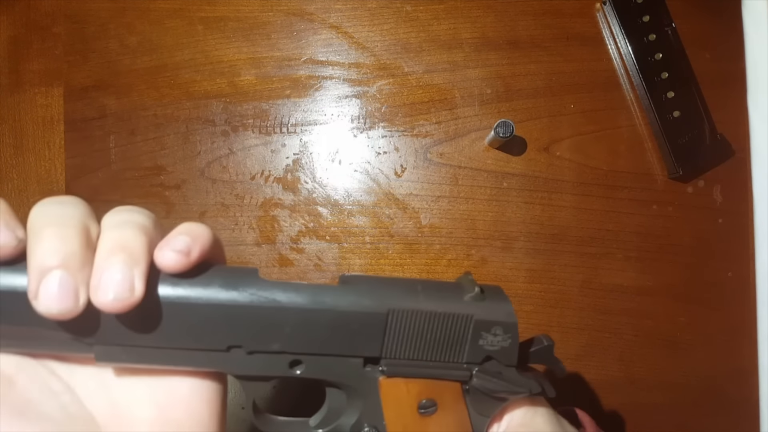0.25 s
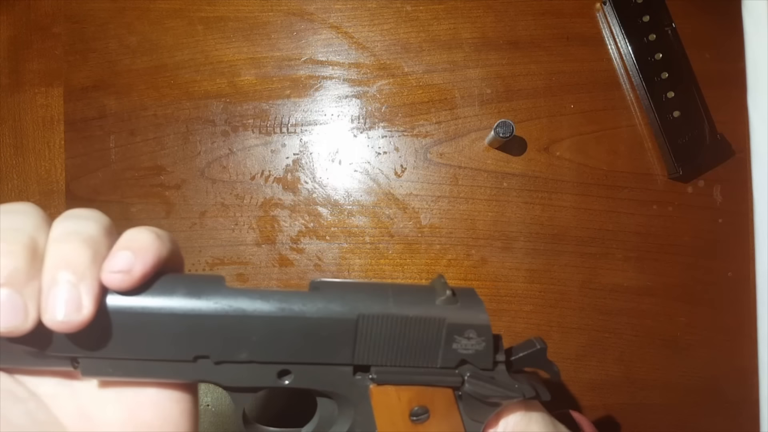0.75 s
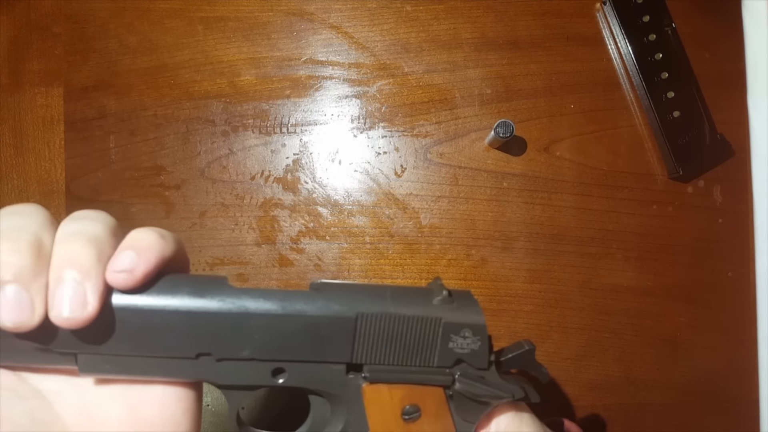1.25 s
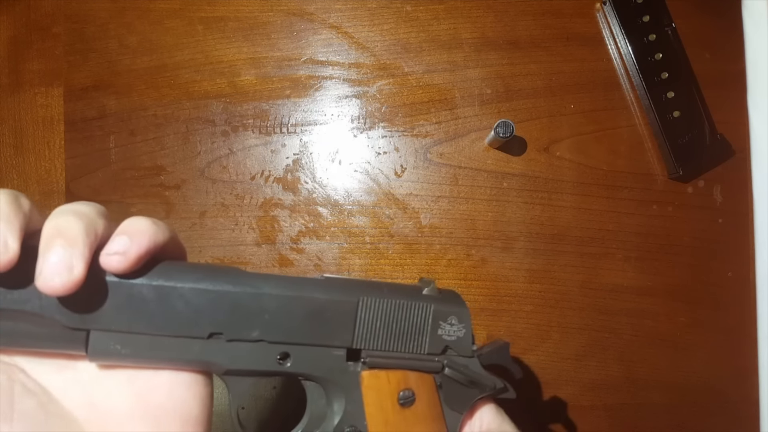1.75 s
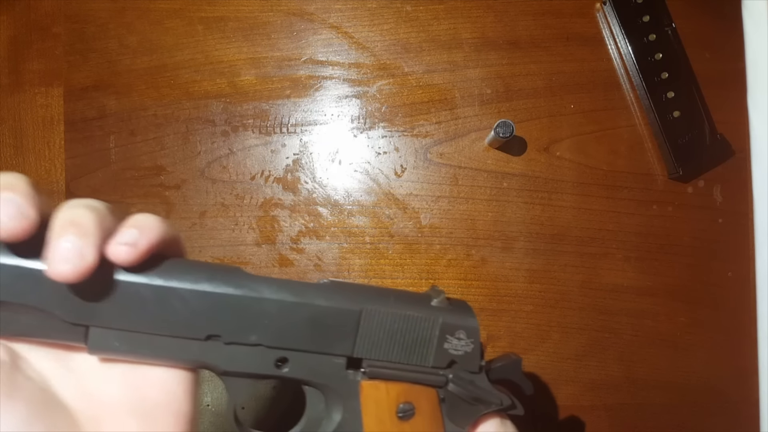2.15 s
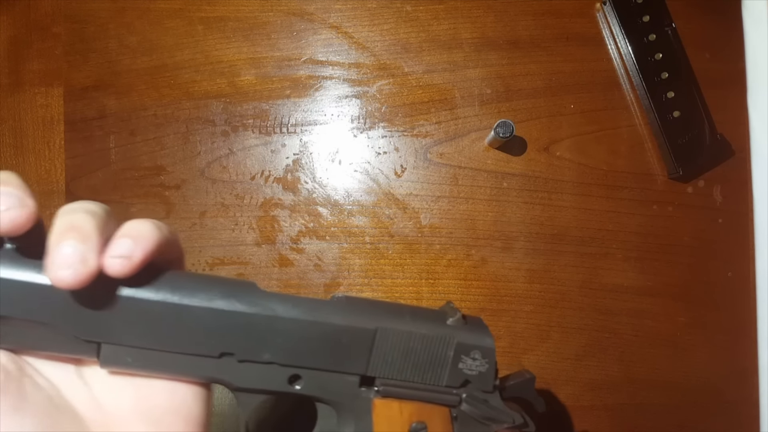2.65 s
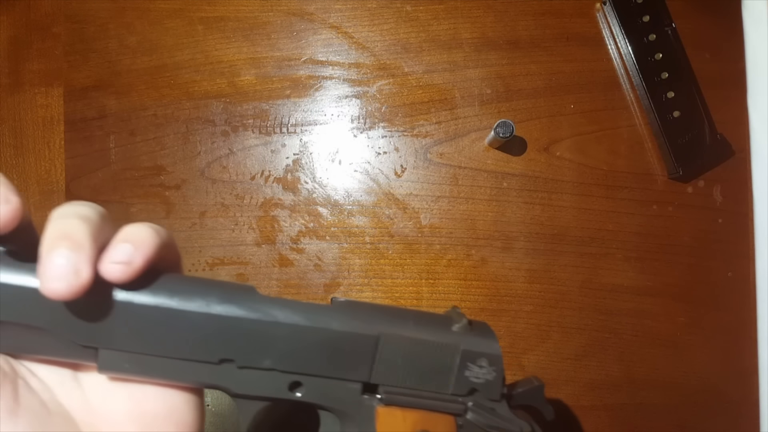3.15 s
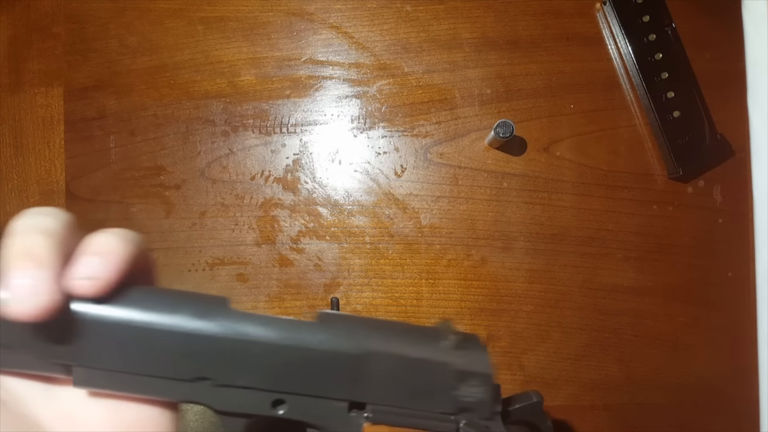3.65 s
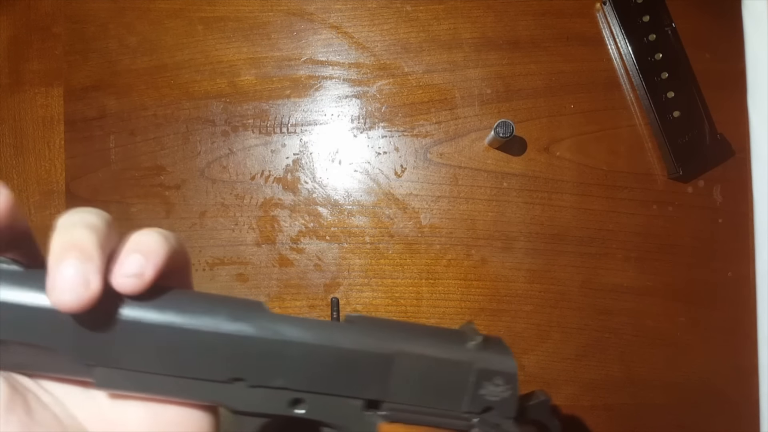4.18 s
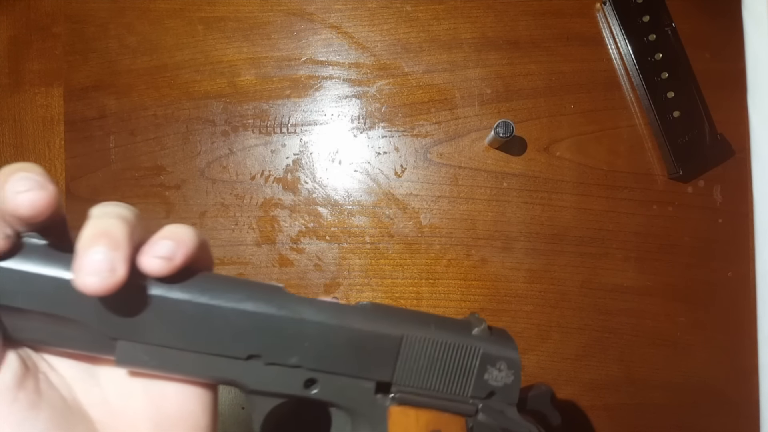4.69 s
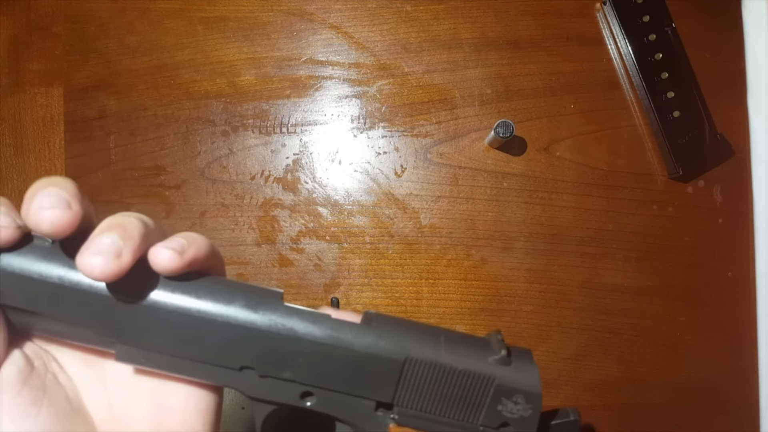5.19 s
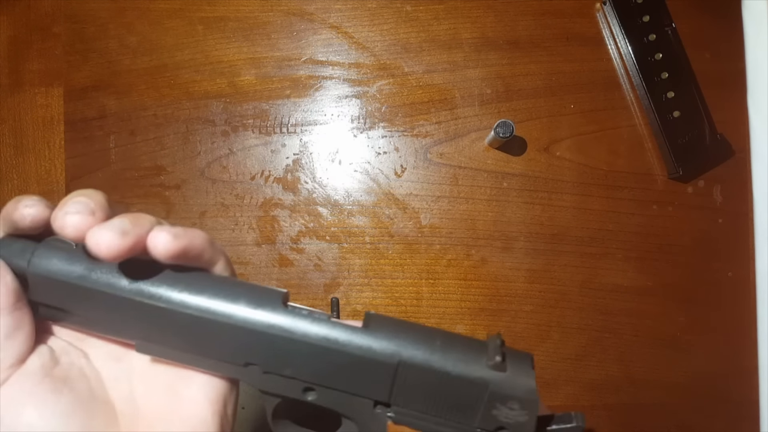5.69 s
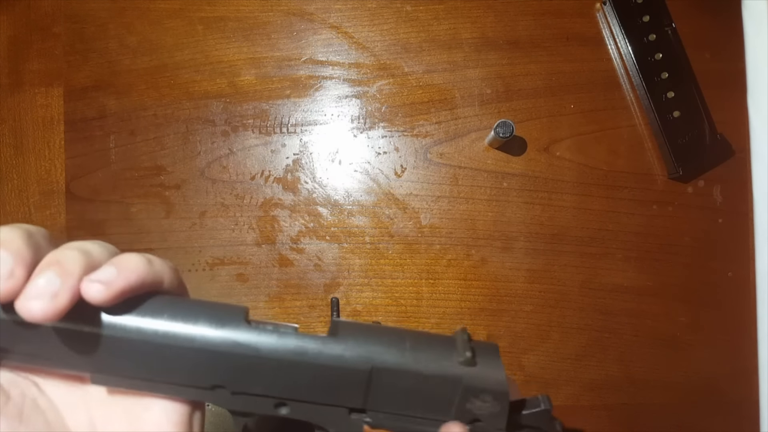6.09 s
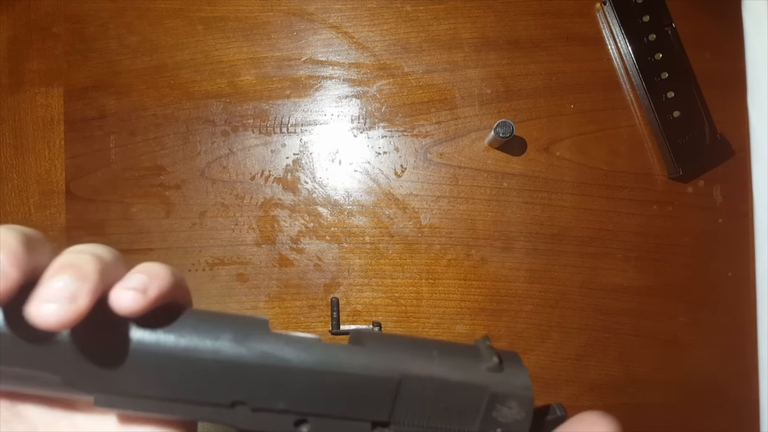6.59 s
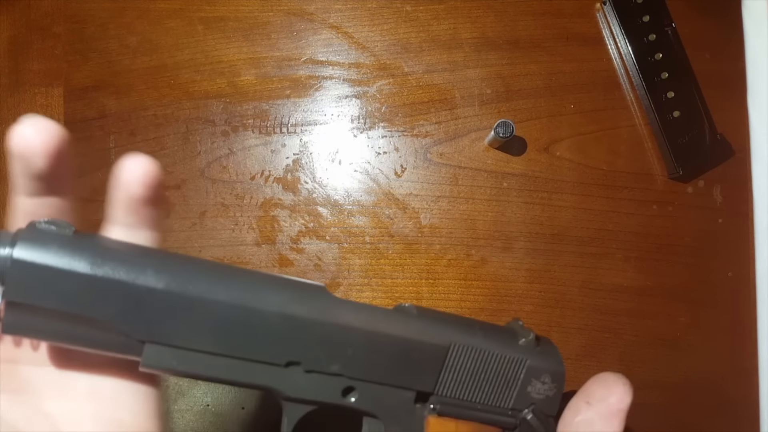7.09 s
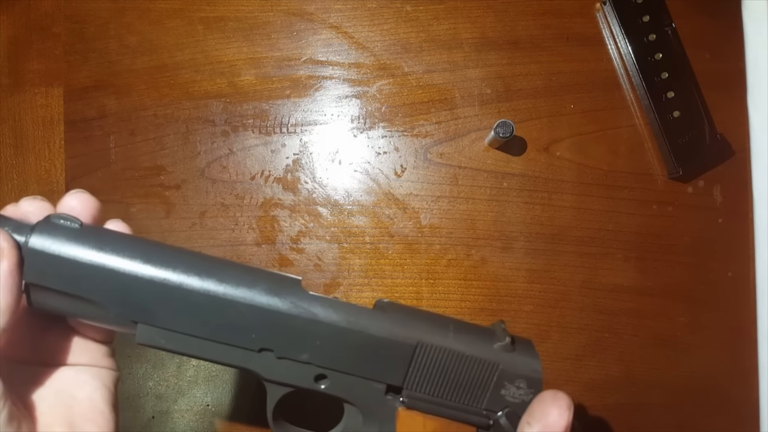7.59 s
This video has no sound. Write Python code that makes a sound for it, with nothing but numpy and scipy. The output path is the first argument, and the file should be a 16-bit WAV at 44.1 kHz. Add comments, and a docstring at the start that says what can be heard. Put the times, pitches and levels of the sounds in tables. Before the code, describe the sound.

In a small quiet room, a steel pistol is handled very close to the microphone. A quick bright scrape ends in a double clack, then softer slides and ticks. Three sharp metal knocks follow mid-way, then a very loud snap with a low puff of air. The faint hum dips afterwards as light clicks and a soft slide finish.

```python
"""A small quiet room: a steel pistol is worked by hand over a wooden table, close to the left microphone.
The slide scrapes along its rails and sets the recoil spring singing; the barrel knocks in and out of its lugs.
Small parts tick and rattle, and one hard snap pushes a puff of air onto the microphone.
Noise makes the contacts, scrapes and room tone; decaying sines make the ringing steel.
The recorder's gain ducks for about a second after the puff."""
import sys
import numpy as np
from scipy import signal
from scipy.fft import rfft, irfft
from scipy.io import wavfile
from scipy.ndimage import uniform_filter1d

SR = 44100
rng = np.random.default_rng(int(sys.argv[2]) if len(sys.argv) > 2 else 0)


def transcribe(u):
    """Save the signal u as a 16-bit wav file named by the first command-line argument.

    u: samples, shape (n,) or (channels, n), limited to [-1, 1]; the rate is SR.
    q: integer samples, one column per channel.
    """
    v = np.clip(np.atleast_2d(u).T, -1, 1)
    q = np.round(v * 32767).astype(np.int16)
    wavfile.write(sys.argv[1], SR, q)


N = 345479
CLOCK = np.arange(N) / SR  # time in the scene [s]
AGE = np.arange(SR // 3) / SR  # time since a blow [s]


def amp(db):
    """Decibels to gain."""
    return 10 ** (np.asarray(db) / 20)


def fade(t60):
    """Exponential decay, 60 dB down after t60 seconds."""
    return np.exp(-np.log(1000) * AGE / max(t60, 1e-4))


def burst(t60):
    """White noise that dies away."""
    return rng.standard_normal(len(AGE)) * fade(t60)


def blow(x, db):
    """Give a short sound the energy of 3 ms at this rms level."""
    return x * amp(db) * np.sqrt(.003 * SR / np.sum(x ** 2))


def level(x, db):
    """Set the rms level."""
    return x * amp(db) / np.std(x)


def add(track, s, x):
    """Mix a sound in at its time."""
    i = int(s * SR)
    track[i:i + len(x)] += x[:N - i]


def through(x, response):
    """Convolve, keeping the length."""
    return signal.fftconvolve(x, response)[:len(x)]


def colour(x, points, size=1024):
    """Minimum-phase filter through (frequency [Hz], gain [dB]) points."""
    hz, db = np.transpose(points)
    bins = np.maximum(np.fft.rfftfreq(size, 1 / SR), 1)
    gain_db = np.interp(np.log(bins), np.log(hz), db)
    cepstrum = irfft(np.log(amp(gain_db)))
    # folding the cepstrum onto positive time makes the filter causal
    cepstrum[1:size // 2] *= 2
    cepstrum[size // 2 + 1:] = 0
    return through(x, irfft(np.exp(rfft(cepstrum))))


def band(x, hz, width_hz):
    """A single resonance."""
    hz_safe, width_safe = min(hz, .45 * SR), min(width_hz, .4 * SR)
    b, a = signal.iirpeak(hz_safe, hz / width_safe, fs=SR)
    return signal.lfilter(b, a, x)


def ring(modes, scatter_db=0):
    """Sum of decaying sine modes; level and pitch scatter a little at every blow."""
    out = np.zeros(len(AGE))
    for k, (hz, db, t60) in enumerate(modes):
        level_chance, pitch_chance = rng.standard_normal(2)
        pitch = hz * (1 + 0.0026 * pitch_chance)
        wave = np.sin(2 * np.pi * pitch * AGE + k * np.pi)  # neighbours start in opposite directions
        out += amp(db + scatter_db * level_chance) * fade(t60) * wave
    return out


# the room's air at the microphones: (frequency [Hz], gain [dB])
ROOM_AIR = [(20, -14.5), (45, -7), (70, 1), (100, -6), (220, -1.5), (350, -5.5), (800, -10), (1500, -13.5),
            (1800, -14.5), (2600, -18), (5000, -23), (10000, -27.5), (14000, -23.5)]
# mains and fan hum: (frequency [Hz], level [dB])
MAINS_FAN_HUM = [(60, -86.5), (120, -76.5), (199, -77), (240, -82.5), (1358, -87.5)]


def background():
    """Room tone with a wavering hum; both microphones share the bass and the left one hisses a little."""
    common, left, right = (colour(rng.standard_normal(N), ROOM_AIR, size=8192) for _ in range(3))
    shared = colour(common, [(200, 7), (1500, -1.5), (5000, -14)])
    air = level(np.array([shared + 2.7 * left, shared + 2.9 * right]), -66.0)
    for hz, db in MAINS_FAN_HUM:
        waver = level(band(rng.standard_normal(N), hz, width_hz=4.8), db - 4.5)
        steady = level(np.sin(2 * np.pi * hz * CLOCK), db - 1.5)
        air = air + waver + steady
    hiss = band(band(rng.standard_normal(N), 7300, 1600), 7300, 1600)
    air[0] += level(hiss, -84.5)
    return air


# free strokes of the slide on its rails:
# (middle time [s], length [s], rasp level [dB], low spring note level [dB], high spring notes level [dB])
SLIDE_STROKES = [(0.099, .17, -47, -46, -42.5), (0.59, 0.35, -70, -72, -74.5),
                 (0.909, 0.11, -60, -56.5, -56), (1.151, 0.23, -78, -61.5, -70.5),
                 (2.232, 0.083, -64.5, -77, -83), (3.015, .11, -65, -71.5, -71),
                 (3.585, .12, -57.5, -69.5, -59.5), (4.047, 0.061, -52, -58, -59),
                 (4.525, .08, -67, -74, -67), (6.79, 0.19, -64, -70, -60.5), (7.543, 0.28, -69, -77, -79)]
# the slide gathers speed before each stop; levels of its spring notes are against the rasp
RUN_UP_S, RUN_UP_LOW_DB, RUN_UP_HIGH_DB = 0.063, -4, 1.5


def slide_motion():
    """Gains of rasp, low and high spring notes: free strokes swell and fade, run-ups grow until the stop."""
    gains = np.zeros((3, N))
    for middle, length_s, *levels_db in SLIDE_STROKES:
        speed = np.interp(CLOCK, [middle - length_s / 2, middle, middle + length_s / 2], [0, 1, 0])
        gains += np.outer(amp(levels_db), np.sin(np.pi / 2 * speed) ** 3)
    for s, *_, rasp_db, _, _ in STOP_KNOCKS:
        speed = np.interp(CLOCK, [s - RUN_UP_S, s], [0, 1], right=0)
        levels_db = rasp_db + np.array([0, RUN_UP_LOW_DB, RUN_UP_HIGH_DB])
        gains += np.outer(amp(levels_db), np.sin(np.pi / 2 * speed) ** 3)
    return gains


# steel rasping on the rails: (frequency [Hz], gain [dB])
RAIL_RASP = [(150, -23), (600, -14), (1100, 4.5), (1400, -5), (2200, -5), (3200, -9), (4800, -4.5),
             (7000, -9.5), (9200, -9.5), (10500, -22), (14500, -20)]
# resonances of the sliding spring, low note first; a second pass is twice as wide, and the levels
# balance the high notes only: (frequency [Hz], width of first pass [Hz], level [dB])
SPRING_SINGING = [(2270, 1100, 0), (8150, 330, 2.5), (11600, 330, -6)]


def scrapes():
    """Countless tiny slips rasp on the rails and drag the spring's coils along their guide."""
    unevenness = uniform_filter1d(rng.standard_normal(N), size=130)
    catching = amp(2.0 * level(unevenness, 0))  # the hand never pulls evenly
    slip_sizes = amp(7.3 * np.minimum(rng.exponential(size=N), 4.5))
    slips = catching * rng.standard_normal(N) * slip_sizes
    low, *high = (level(band(band(slips, hz, width), hz, 2 * width), db)
                  for hz, width, db in SPRING_SINGING)
    voices = colour(slips, RAIL_RASP), low, sum(high)
    return sum(gain * level(voice, 0) for gain, voice in zip(slide_motion(), voices))


# two steel faces meeting: (frequency [Hz], gain [dB])
STEEL_CRACK = [(100, -31), (350, -19.5), (600, -10.5), (1100, -1), (2000, 5), (5000, -5.5), (8000, -1.5),
               (11000, -12), (14500, -9)]


def crack(t60):
    """The brief noisy chatter of two steel faces meeting."""
    return colour(burst(t60), STEEL_CRACK)


# modes of the hand-damped slide and frame: (frequency [Hz], level [dB], t60 [s])
FRAME_MODES = [(780, -25, 0.01), (1200, -2.5, 0.014), (1719, -0.5, 0.028), (2134, -4, 0.02),
               (2545, -10, 0.017), (3020, 1.5, 0.015), (3390, -0.5, 0.021), (4116, -2, 0.027),
               (5560, -10, 0.0086), (6760, 0, 0.005), (7190, -3.5, .01), (7690, -6.5, 0.0045),
               (9000, -9, 0.024), (10186, -18, 0.0077), (12730, -13.5, 0.0063)]


def frame_ring():
    """Bending waves reach each mode at a slightly different moment; the shifting grip detunes them."""
    waves = np.zeros(len(AGE))
    for hz, db, t60 in FRAME_MODES:
        lag = rng.integers(0, SR // 1500)
        detune = 1 + .012 * rng.standard_normal()
        mode = ring([(hz * detune, db, t60)], scatter_db=2.0)
        waves += np.pad(mode, (lag, 0))[:len(AGE)]
    return colour(waves, [(150, -22), (600, -6.5), (1000, 4.0)])  # so small a body radiates little bass


# modes of the barrel: (frequency [Hz], level [dB], share of the knock's barrel t60)
BARREL_MODES = [(4668, 11, 1), (4330, -13.5, .8), (4850, -13, 0.82)]
# modes of the recoil spring and its guide: (frequency [Hz], level [dB], t60 [s])
SPRING_MODES = [(2204, 0, 0.0017), (8220, 1, 0.076), (8200, -3, 0.011), (12000, -8, 0.012)]


def knock(frame_db, bright_db, favoured_hz, barrel_db, barrel_t60, spring_db):
    """One impact: the frame clacks, the barrel rings until the hand damps it, the spring shivers."""
    clack = blow(frame_ring(), 0) + blow(crack(t60=0.0098), 0.48)
    clack = colour(clack, [(512, 0), (16384, 5 * bright_db)])  # tilt over five octaves
    clack = blow(clack, 0) + blow(band(clack, favoured_hz, 0.39 * favoured_hz), -4.5)
    barrel = ring([(hz, db, share * barrel_t60) for hz, db, share in BARREL_MODES])
    barrel *= 1 - fade(t60=0.0047)  # it takes a moment to speak
    spring = ring(SPRING_MODES, scatter_db=8.5)
    return blow(clack, frame_db) + blow(barrel, barrel_db) + blow(spring, spring_db)


# slide and barrel meeting their stops:
# (time [s], frame level [dB], brightness [dB per octave], frequency the point of contact favours [Hz],
#  barrel level [dB], barrel t60 [s], spring level [dB], run-up rasp level [dB],
#  delay of first rebound [s], rebound level against the blow [dB])
STOP_KNOCKS = [(0.2236, -18, 2.5, 2200, -5.5, .024, -28, -45, 0.0028, -13.5),
               (0.2442, -18.5, 2, 2150, -11, .023, -31, -62, .003, -11),
               (0.8480, -24.5, 1, 1960, -23, 0.0055, -36.5, -82, 0.0077, -5),
               (3.1659, -20, 0.5, 6700, -18, 0.0065, -39, -58.5, .0029, -3.5),
               (3.7691, -18.5, 3, 3200, -11.5, 0.0082, -19.5, -48, .0062, -3.5),
               (4.2430, -15.5, 2, 8430, -8, 0.0068, -46, -44.5, 0.014, -15),
               (6.1508, -47.5, -6, 2030, -46, .012, -73.5, -80.5, 0.0024, -16.5),
               (6.8860, -46.5, -1, 2400, -49, 0.021, -44, -74, .003, -19)]
# each rebound comes sooner and weaker than the last; all ring the barrel less than the blow
REBOUND_SHRINK, REBOUND_LOSS_DB, REBOUND_BARREL_DB = 0.74, -6, -5


def knocks(count=2):
    """The slide hits a stop and rebounds, each time sooner and weaker."""
    out = np.zeros(N)
    for s, frame_db, bright_db, hz, barrel_db, t60, spring_db, _, gap_s, drop_db in STOP_KNOCKS:
        add(out, s, knock(frame_db, bright_db, hz, barrel_db, t60, spring_db))
        for k in range(count):
            s += gap_s * REBOUND_SHRINK ** k
            rebound = knock(frame_db, bright_db, hz, barrel_db + REBOUND_BARREL_DB, t60, spring_db)
            add(out, s, amp(drop_db + k * REBOUND_LOSS_DB) * rebound)
    return out


def tick(db, centre_hz, spring_db, t60):
    """Small parts touch: a contact noise and a damped frame ring around one centre, with a spring shiver."""
    contact = blow(crack(t60), 0) + blow(frame_ring() * fade(3 * t60), -8)
    broad = band(contact, centre_hz, 0.83 * centre_hz)
    own_note = band(broad, centre_hz, 0.38 * centre_hz)
    touch = blow(broad, 0) + blow(own_note, -4.5)
    return blow(touch, db) + blow(ring(SPRING_MODES, scatter_db=6.5), spring_db)


# light contacts of small parts: (time [s], level [dB], centre frequency [Hz], spring level [dB])
SMALL_TICKS = [(0.498, -59.5, 2400, -86), (0.6588, -51, 2900, -60), (1.443, -56.5, 3400, -82),
               (1.5514, -38, 7960, -37.5), (2.2144, -52, 2500, -75), (2.3035, -50.5, 7800, -62),
               (2.3535, -56.5, 800, -85), (2.4686, -50.5, 1030, -85), (3.591, -55.5, 5100, -47),
               (4.0340, -55, 6040, -42.5), (4.0486, -45, 6600, -53), (4.1943, -49, 2080, -57),
               (4.2135, -42.5, 855, -42), (4.5255, -48, 1110, -68), (4.7407, -54, 1584, -64.5),
               (5.1037, -44, 6060, -76), (5.3430, -57.5, 3200, -85), (5.3894, -47, 3600, -87),
               (5.4145, -44, 1040, -85), (5.4156, -44.5, 3530, -87), (5.6783, -52.5, 4820, -85),
               (6.4928, -47, 1470, -86), (6.7571, -46.5, 2400, -44), (6.7843, -39.5, 2506, -37.5),
               (6.8730, -43.5, 1620, -73), (7.0588, -58, 4040, -76), (7.1200, -58.5, 3600, -85),
               (7.1587, -45.5, 8000, -77), (7.3848, -44.5, 2110, -53), (7.4888, -40, 7900, -77),
               (7.5136, -37, 10300, -75), (7.548, -45.5, 5980, -81)]
TICK_T60_S = 0.0077
FAINT_TICK_DB, FAINT_TICK_HZ = -61.5, 3340  # stray contacts as the grip shifts; middle of their centres


def ticks(count=7):
    """Distinct clicks, and faint stray ones at random times; harder strays have a higher centre."""
    out = np.zeros(N)
    for s, db, centre_hz, spring_db in SMALL_TICKS:
        add(out, s, tick(db, centre_hz, spring_db, TICK_T60_S))
    for when, hardness in rng.random((count, 2)):
        centre_hz = FAINT_TICK_HZ * 2 ** (hardness - .5)
        add(out, when * CLOCK[-1], tick(FAINT_TICK_DB, centre_hz, FAINT_TICK_DB - 17, TICK_T60_S))
    return out


# loose parts chatter, then settle:
# (time [s], length [s], first contact level [dB], centre frequency [Hz], spring level [dB])
LOOSE_RATTLES = [(1.594, .005, -40, 8500, -50), (1.6032, .012, -28.5, 8000, -58),
                 (1.624, 0.06, -49, 11000, -69.5), (6.789, .04, -52, 2600, -68)]
# modes of the small catch that chatters: (frequency [Hz], level [dB], t60 [s])
CATCH_MODES = [(840, -15, 0.014), (1820, -10.5, 0.016), (3010, -8, 0.022), (5450, -8, 0.021),
               (7650, -5, .012), (7880, 0.5, 0.016), (12400, -4, .015)]
# fall over one rattle; scatter of the centre [octaves]; catch ring against the contact
RATTLE_FALL_DB, RATTLE_SPREAD_OCT, CATCH_DB = -4.5, .45, -2


def rattles(count=4):
    """A loose catch strikes several times at uneven gaps, dying away."""
    out = np.zeros(N)
    for s, length_s, db, centre_hz, spring_db in LOOSE_RATTLES:
        for k, (late, hardness) in enumerate(rng.uniform(-0.82, 1, (count, 2))):
            progress = (k + 0.23 * late * (k > 0)) / (count - 1)
            strike_hz = centre_hz * 2 ** (RATTLE_SPREAD_OCT * hardness)
            contact = tick(db, strike_hz, spring_db, t60=0.022)
            catch = blow(ring(CATCH_MODES, scatter_db=6.0), db + CATCH_DB)
            add(out, s + length_s * progress, amp(RATTLE_FALL_DB * progress) * (contact + catch))
    return out


# the hard snap, its rebound and rattle: (time [s], chatter level [dB], chatter t60 [s])
SNAP_BLOWS = [(6.2667, -6.5, 0.0048), (6.2678, -18, 0.0034), (6.2753, -18, 0.18)]
# modes of the hammer: (frequency [Hz], level [dB], t60 [s])
HAMMER_MODES = [(2400, -9, 0.009), (3350, -8, 0.015), (4150, -6.5, 0.018), (5750, -12.5, 0.011),
                (6900, -9.5, 0.023), (8964, -0.5, 0.014), (9007, 9, 0.016), (11900, -13.5, 0.029)]


def snap():
    """The hammer falls on steel, rebounds and rattles out: noise chatter over ringing modes."""
    out = np.zeros(N)
    for s, db, t60 in SNAP_BLOWS:
        chatter = colour(burst(t60), [(300, -13), (1350, -24.5), (2100, 4), (4000, 1.5),
                                      (5200, 0.0), (6800, 4), (9000, 5.5), (14000, 3.0)])
        add(out, s, blow(chatter, db) + blow(ring(HAMMER_MODES, scatter_db=7.0), db - 5))
    return out


PUFF_S, PUFF_DB, PUFF_HZ, PUFF_T60_S = 6.2684, 0, 98, 0.019


def puff():
    """The snap pushes air at the near microphone: a turbulent pop and a heavily damped pressure swing."""
    out = np.zeros(N)
    swing = np.cos(2 * np.pi * PUFF_HZ * AGE + .35) * fade(PUFF_T60_S) * (1 - fade(t60=0.0017))
    eddies = colour(burst(t60=0.0014), [(100, -11.0), (600, -4.5), (1100, -0.5), (2000, -1.5), (8000, -28)])
    add(out, PUFF_S, amp(PUFF_DB) * swing)
    add(out, SNAP_BLOWS[0][0], blow(eddies, db=-10.5))
    return out


# colour of the reflections: (frequency [Hz], gain [dB])
WALL_COLOUR = [(100, -3.5), (700, 1), (2000, 2), (4600, 0.5), (7000, -3.5), (10000, -5.5), (14500, -10.5)]


def room(x, early_db, late_db, t60):
    """Close reflections from table and hands, then the short tail of the walls, as decaying noise."""
    early = burst(t60=0.13) * (AGE > .002)
    late = burst(t60) * (AGE > .009)
    response = amp(early_db) * early / np.linalg.norm(early) + amp(late_db) * late / np.linalg.norm(late)
    return through(x, colour(response, WALL_COLOUR))


# the recorder turns down after a blast of bass; the slope is per doubling of (1 + load)
DUCK_ATTACK_S, DUCK_HOLD_S, DUCK_RELEASE_S = 0.33, 0.18, 0.6
DUCK_THRESHOLD_DB, DUCK_SLOPE_DB = -32.5, 7.5


def gain_control(x):
    """Recent bass power at the near microphone pulls the gain down; it holds, then creeps back."""
    bass = signal.sosfilt(signal.butter(2, 300, fs=SR, output="sos"), x[0])
    corners = np.cumsum([0, DUCK_ATTACK_S, DUCK_HOLD_S, DUCK_RELEASE_S])
    memory = np.interp(CLOCK[:2 * SR], corners, [0, 1, 1, 0])
    load = through(bass ** 2, memory / memory.sum()) / amp(DUCK_THRESHOLD_DB) ** 2
    return x * amp(-DUCK_SLOPE_DB * np.log2(1 + np.maximum(load, 0)))


# the pistol as shaded at the right microphone: (frequency [Hz], gain [dB])
FAR_SHADE = [(100, -17.5), (1000, -6.5), (1800, -1.5), (2800, -19), (4600, -13.5), (7000, -24),
             (10000, -20), (14500, -22)]
SLIDE_LAG_S, SNAP_LAG_S = .00032, .00054  # extra travel time to the right microphone


def scene():
    """The pistol faces the left microphone; the right one hears it later and shaded."""
    slide = knocks() + ticks() + rattles() + scrapes()
    hammer = snap()
    pistol = slide + hammer
    air_push = puff()
    delayed = np.roll(slide, int(SLIDE_LAG_S * SR)) + np.roll(hammer, int(SNAP_LAG_S * SR))
    far = colour(delayed, FAR_SHADE)
    left = pistol + air_push + room(pistol, early_db=-12.5, late_db=-18.5, t60=0.3)
    right = far + amp(-39) * air_push + room(pistol, early_db=-13, late_db=-13.0, t60=0.2)
    return np.array([left, right]) + background()


TOP_HZ = 14700


def record(dry):
    """The gain ducks, peaks beyond full scale clip and the top is cut."""
    clipped = np.clip(gain_control(dry), -1, 1)
    top_cut = signal.ellip(12, .2, 90, TOP_HZ, fs=SR, output="sos")
    return signal.sosfilt(top_cut, clipped)


dry = scene()
out = record(dry)
transcribe(out)
```